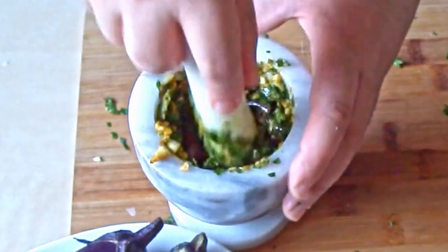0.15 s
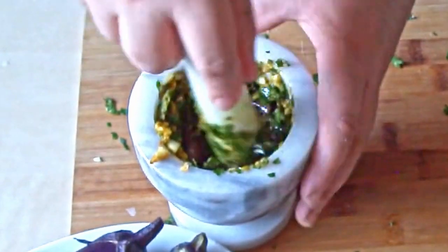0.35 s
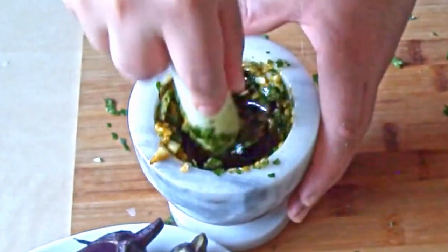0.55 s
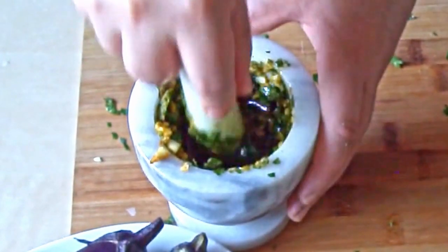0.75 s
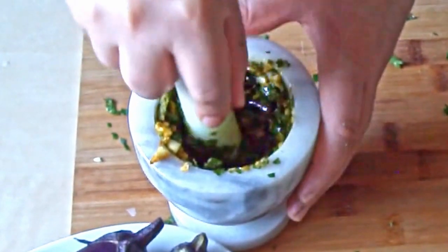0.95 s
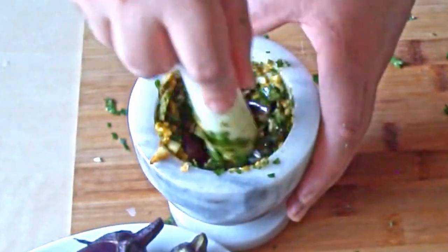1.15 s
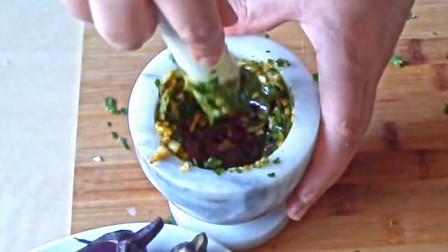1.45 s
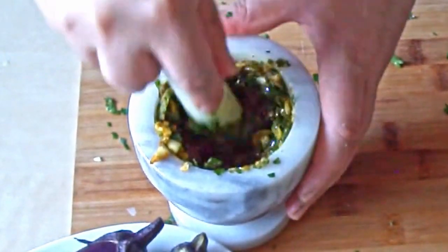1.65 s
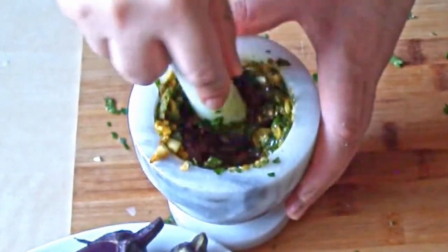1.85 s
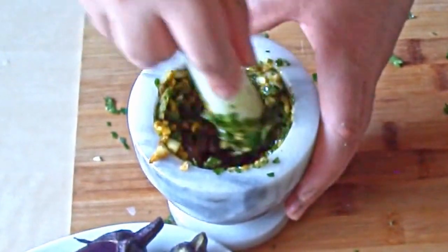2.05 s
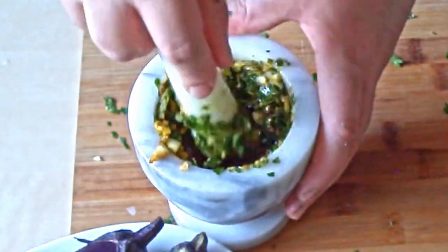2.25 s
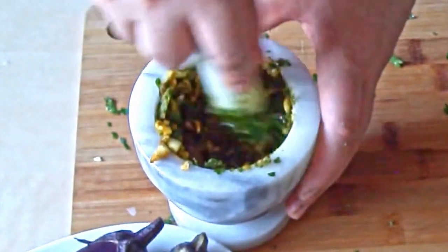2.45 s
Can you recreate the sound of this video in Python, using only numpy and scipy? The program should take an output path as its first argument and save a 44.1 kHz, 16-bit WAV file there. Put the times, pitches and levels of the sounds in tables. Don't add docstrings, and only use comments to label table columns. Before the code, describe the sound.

A stone pestle pounds wet herb paste in a stone mortar: four increasingly hard, cracking knocks, then softer squashes and sticky crackles, with board thuds, in a small kitchen, heard close with low rumble.

```python
import sys
import numpy as np
from scipy import signal
from scipy.fft import rfft, irfft, next_fast_len
from scipy.io import wavfile
from scipy.ndimage import uniform_filter1d

SR = 44100
rng = np.random.default_rng(int(sys.argv[2]) if len(sys.argv) > 2 else 0)


def rack_gain(trim_db):
    fader = np.asarray(trim_db, float)
    return 10 ** (fader / 20)


def pcm_store(signal):
    levels = np.round(np.clip(np.atleast_2d(signal), -1, 1) * 32767)
    wavfile.write(sys.argv[1], SR, levels.astype(np.int16).T)


N = 114660

# (frequency [Hz], level [dB])
PASTE = [(400, -18.5), (1000, -6.5), (2000, -4), (3000, 0), (5500, -3.5), (8000, -12.5), (12000, -18.5),
         (16000, -19)]


def colour(x, points):
    hz, db = np.array(points).T
    n = next_fast_len(len(x) + 4096)
    f = np.arange(n // 2 + 1) * SR / n + 1
    gain = rack_gain(np.interp(np.log(f), np.log(hz), db))
    return irfft(rfft(x, n) * gain, n)[:len(x)]


def band(x, hz, q):
    return signal.lfilter(*signal.iirpeak(min(hz, 0.45 * SR), q, fs=SR), x)


def decay(t, t60):
    return np.exp(-np.log(1000) * t / t60)


def ring(modes, t, phase=0, scatter_db=0, detune=0):
    size, shift = rng.standard_normal((2, len(modes)))
    out = 0
    for (hz, db, t60), s, d in zip(modes, size, shift):
        wave = np.sin(2 * np.pi * hz * (1 + detune * d) * t + phase)
        out = out + rack_gain(db + scatter_db * s) * wave * decay(t, t60)
    return out


def add(out, s, x):
    i = max(int(round(s * SR)), 0)
    out[i:i + len(x)] += x[:N - i]


def grains(size, rate, spread_db):
    chance, sign, weight = rng.random((3, size))
    g = (chance < rate / SR) * np.sign(sign - 0.5) * rack_gain(-spread_db * np.log(weight + 0.01))
    return g / np.sqrt(np.mean(g ** 2) + 1e-12)


def clumps(rate, slew=2):
    k = int(SR / rate)
    return uniform_filter1d(np.repeat(rng.standard_normal(N // k + 1), k), k // slew)[:N]


def stone_contacts():
    # (time [s], bowl level [dB], click level [dB], pestle level [dB])
    contacts = [(0.2231, -22.5, -10.5, -71), (0.45, -49.5, -20.5, -53.5), (0.4512, -30, -20.5, -68),
                (0.696, -10.5, -15.5, -52.5), (0.9255, -23, -4, -25), (.927, -13.5, 4.5, -24.5),
                (0.9301, -4.5, -17, -46.5), (1.1682, -4.5, -4, -34.5), (1.731, -41.5, -74.5, -83),
                (1.7742, -41.5, -23, -72.5), (1.7771, -33.5, -19.5, -66), (2.033, -35.5, -22.5, -58),
                (2.036, -43.5, -21.5, -75.5), (2.271, -39.5, -44.5, -66.5)]
    tick_levels = [-20.5, -23, -39, -19.5, -8, 2, -13.5, -4, -61.5, -24.5, -21.5, -29.5, -21.5, -43]
    # (frequency [Hz], level [dB], t60 [s])
    bowl = [(970, -5, 0.01334), (1212, -10.5, 0.0073), (1272.7, -0.5, 0.02324), (1396.1, -2, 0.0269),
            (1483.7, -6, 0.0222), (1549.8, -3.5, 0.0239), (1636.5, -1.5, 0.0333), (1810, 1.5, 0.03005),
            (2377, 5.5, 0.0164), (2612.4, -3, 0.0257), (2894, 5, 0.00956)]
    click = [(2114, -7, 0.0072), (2600, 1, 0.01376), (2851, 4, 0.0069), (3711.3, -2, 0.01535),
             (3935.5, 2, 0.00636), (4250, 9, 0.00442), (5400, -4.5, 0.00293)]
    pestle = [(6840, -6.5, 0.034), (6946, 10, 0.035), (7004, 9.5, 0.058), (7024, 9.5, 0.0403),
              (6966, -0.5, 0.039), (7123, 2, 0.047)]
    tick = [(7798, 0.5, 0.00378), (9440, -8, 0.00495), (12390, -6.5, 0.00386)]
    out, t = np.zeros(N), np.arange(SR // 3) / SR
    onset = np.minimum(t / 0.000336, 1)
    for (s, bowl_db, click_db, pestle_db), tick_db in zip(contacts, tick_levels):
        stone = rack_gain(bowl_db) * ring(bowl, t, scatter_db=1.5, detune=0.005)
        stone += rack_gain(click_db) * ring(click, t, scatter_db=1.5, detune=0.03)
        stone += rack_gain(pestle_db) * ring(pestle, t, scatter_db=1.5, detune=0.004)
        stone += rack_gain(tick_db) * ring(tick, t, scatter_db=1.5, detune=0.03)
        add(out, s, stone * onset)
    return out


def crushed_paste():
    # (time [s], level [dB], rise [s], fall [s], centre [Hz])
    crushes = [
        (0.2234, -4.5, 0.00054, 0.00192, 4180),
        (0.4489, -17, 0.00213, 0.00804, 4200),
        (0.693, -13.5, 0.00515, 0.00246, 3856),
        (0.925, 0, 0.000665, 0.0047, 3820),
        (1.168, -14.5, 0.00297, 0.00405, 5900),
        (1.7769, -10, 0.0012, 0.00548, 4090),
        (2.033, -18.5, 0.002, 0.0135, 2830),
    ]
    out, lead_s = np.zeros(N), 0.02
    v = np.arange(3000) / SR - lead_s
    for s, db, rise, fall, hz in crushes:
        env = np.where(v < 0, np.exp(v / max(rise, 2e-4)), np.exp(-v / max(fall, 5e-4)))
        crush = band(colour(grains(3000, 11000, 1.0) * env, PASTE), hz, 0.816)
        add(out, s - lead_s, rack_gain(db + 6) * crush)
    return out


def blows():
    high_pass = signal.butter(2, 624, "high", fs=SR, output="sos")
    return signal.sosfilt(high_pass, stone_contacts() + crushed_paste())


def smacks():
    # (time [s], peak level [dB], centre [Hz], decay [s])
    bursts = [(0.0743, -27, 2960, 0.0108), (0.2044, -29.5, 4300, 0.0075), (0.2212, -30, 5200, 0.00117),
              (0.293, -32, 4200, 0.0028), (0.297, -23.5, 4265, 0.00785), (0.434, -34.5, 4500, 0.00286),
              (0.533, -19, 2826, 0.00452), (.542, -29, 4120, 0.0094), (0.581, -37.5, 9000, 0.00247),
              (0.663, -36.5, 8960, 0.0037), (0.689, -27.5, 3040, 0.0025), (0.7674, -20.5, 4250, 0.00451),
              (1.235, -25.5, 2950, 0.0073), (1.466, -34, 5400, 0.0042), (1.4698, -28.5, 5300, 0.00202),
              (1.478, -28, 4600, 0.00414), (1.487, -32.5, 4200, 0.0025), (1.4954, -18.5, 5400, 0.00155),
              (1.501, -23.5, 4860, 0.00297), (1.5053, -25.5, 5000, 0.00185), (1.514, -24, 4230, .003),
              (1.5167, -25, 2600, .003), (1.5314, -20.5, 2600, 0.0012), (1.54, -40.5, 4800, 0.003),
              (1.605, -29.5, 4630, 0.01), (1.678, -39.5, 2600, 0.0068), (1.788, -16, 4530, 0.0027),
              (1.867, -25, 3526, 0.0052), (1.883, -27, 4030, 0.0035), (2.112, -31.5, 5810, 0.0117),
              (2.1225, -20.5, 2530, 0.0046), (2.305, -34.5, 5500, 0.0061), (2.331, -34, 4300, 0.00206),
              (2.338, -32.5, 4230, 0.00174), (2.343, -30, 2810, 0.0028), (2.37, -36.5, 2600, 0.0043),
              (2.377, -33.5, 2670, 0.0089), (2.4244, -23.5, 5650, 0.002), (2.43, -27.5, 5400, .003),
              (2.441, -32, 4400, 0.0033), (2.447, -23, 5150, 0.0029), (2.465, -21, 2880, 0.001855),
              (2.457, -31, 4300, 0.0023), (2.499, -36, 5000, 0.0016), (2.505, -30, 4370, 0.0044),
              (2.5181, -23.5, 2600, 0.004), (2.525, -20, 2655, 0.0036), (2.532, -27, 4040, 0.0034),
              (2.5434, -17.5, 4550, 0.00208), (2.565, -31, 4170, 0.0027), (2.596, -37.5, 4300, 0.0034)]
    lead_bubble = 2.4
    out, t = np.zeros(N), np.arange(2600) / SR
    for s, db, hz, fall in bursts:
        fall = max(fall, 0.001)
        env = np.minimum(t / (0.3 * fall), 1) * np.exp(-t / fall)
        bubbles = grains(len(t), 9000, 3.0) * env
        bubbles[env.argmax()] = lead_bubble * env.max()
        bubbles = colour(bubbles, PASTE)
        add(out, s - 0.001, rack_gain(db + 8.5) * (1.272 * band(bubbles, hz, 3.64) + 0.297 * bubbles))
    return out


def grinding():
    # (time [s], level [dB])
    pressure = [(0, -33), (0.059, -50), (.3, -50.5), (.6, -53.5), (1.4, -58), (1.46, -51.5), (1.483, -31.5),
                (1.537, -32), (1.568, -48.5), (1.75, -55.5), (1.9, -45.5), (1.95, -55), (2.15, -51),
                (2.29, -53), (2.328, -40.5), (2.44, -38), (2.53, -42), (2.6, -43)]
    grit_sizes = (1400, 2700, 4200, 5600, 9000)
    grains_per_s, spread_db, clump_db = 1500, 3.2, 2.4
    crackle, shared = 0, clumps(58)
    for hz in grit_sizes:
        grit = band(grains(N, grains_per_s, spread_db), hz, 2.09)
        crackle = crackle + grit * rack_gain(clump_db * (shared + clumps(120)))
    crackle = colour(crackle, PASTE)
    time_s, level_db = np.array(pressure).T
    return crackle / crackle.std() * rack_gain(np.interp(np.arange(N) / SR, time_s, level_db) - 3)


def board():
    # (time [s], low modes level [dB], upper modes level [dB], counter sway level [dB])
    thumps = [(.0, -21, -20, -8), (0.229, -4.5, -6.5, -2.5), (0.391, -12, -21.5, -44.5),
              (0.4573, -1.5, -4, 0), (0.6999, -2, -3.5, -1), (0.9275, -4, 1.5, -4.5), (.946, -14, 2, -21),
              (1.172, -7, 0, -3), (1.734, -22, -9.5, -38.5), (1.783, -2, -7, -4), (2.042, -15, -17, -5),
              (2.191, -11.5, -29.5, -33), (2.252, -19, -31.5, -35.5), (2.534, -12.5, -17.5, -38.5)]
    # (frequency [Hz], level [dB], t60 [s])
    low_modes = [(66.82, -27, 0.47), (104.16, -28, 0.219), (128.97, -20, 0.2397)]
    upper_modes = [(182.9, -18, 0.231), (202.8, -27.5, 0.136), (242.33, -25.5, 0.254), (278.3, -71.5, 0.24),
                   (335.23, -26, 0.227), (444.2, -34.5, 0.293)]
    push_s = 0.00295
    sway_hz, sway_db, sway_peak_s, sway_lag_s = 22.81, -17, 0.0495, 0.03388
    out, t = np.zeros(N), np.arange(SR // 2) / SR
    push = np.sin(np.pi / 2 * np.minimum(t / push_s, 1)) ** 2
    low = ring(low_modes, t - push_s, -np.pi / 2) * push
    upper = ring(upper_modes, t - push_s, -1.336) * push
    u = t / sway_peak_s
    swell = (u * np.exp(1 - u)) ** 1.395
    sway = rack_gain(sway_db) * swell * np.cos(2 * np.pi * sway_hz * (t - push_s - sway_lag_s))
    for s, low_db, upper_db, counter_db in thumps:
        add(out, s - push_s, rack_gain(low_db) * low + rack_gain(upper_db) * upper + rack_gain(counter_db) * sway)
    return out


def kitchen(x):
    # (frequency [Hz], level [dB], t60 [s])
    echo_bands = [(247.4, -14.5, 0.112), (644, -18, 0.287), (1073.5, -17, 0.2905), (1690, -20, 0.328),
                  (2934, -24, 0.432), (4300, -22.5, 0.195), (5500, -24.5, 0.33), (6830, -21, 0.333),
                  (10000, -26.5, 0.18)]
    # (frequency [Hz], level [dB])
    furnishings = [(100, 0), (7300, 0), (8200, -12), (16000, -16)]
    t, echo = np.arange(SR // 2) / SR, 0
    for hz, db, t60 in echo_bands:
        noise = rng.standard_normal(len(t))
        for _ in range(3):
            noise = band(noise, hz, 1.054)
        echo = echo + rack_gain(db) * noise / noise.std() * decay(t, t60) / np.sqrt(t60 * SR / 14)
    arrival = np.clip((t - 0.004) / 0.00267, 0, 1)
    return signal.fftconvolve(colour(x, furnishings), echo * arrival)[:N]


def hum():
    # (frequency [Hz], density [dB per Hz])
    noise_floor = [(25, -54.5), (60, -61.5), (200, -61.5), (500, -71), (1500, -75), (4000, -87.5),
                   (8000, -92.5), (16000, -100)]
    noise = colour(rng.standard_normal(N), noise_floor) * np.sqrt(SR / 2)
    rumble = signal.sosfilt(signal.butter(1, 300, fs=SR, output="sos"), noise)
    wander_db = 1.7 * clumps(12, slew=1)
    return rack_gain(-8.0) * (noise + rumble * (rack_gain(wander_db) - 1))


def scene():
    solid = board()
    air = blows() + smacks() + grinding()
    return (air + kitchen(air + 0.184 * solid) + 0.5 * solid + hum())[None]


def band_limit(x):
    return signal.sosfilt(signal.butter(12, 20000, fs=SR, output="sos"), x)


def record(dry):
    late_s, late_gain, hiss_db = 32 / 44100, 0.9, -61.5
    overload, overshoot, top_hz = 1.02, 1.2, 15650
    n = next_fast_len(N + 100)
    f = np.arange(n // 2 + 1) * SR / n
    comb = 1 + late_gain * np.exp(-2j * np.pi * f * late_s)
    x = irfft(rfft(dry, n) * comb, n)[:, :N]
    x = x + rack_gain(hiss_db) * rng.standard_normal(x.shape)
    top_cut = signal.ellip(10, 0.2, 80, top_hz, fs=SR, output="sos")
    x = signal.sosfilt(top_cut, np.clip(x, -overload, overload))
    return band_limit(np.clip(x, -overshoot, overshoot))


dry = scene()
out = record(dry)
pcm_store(out)
```